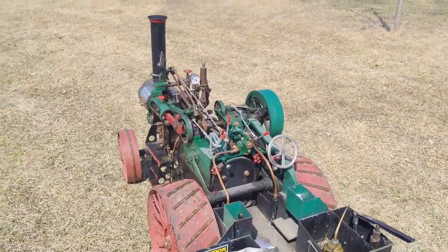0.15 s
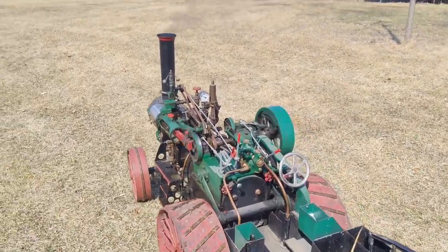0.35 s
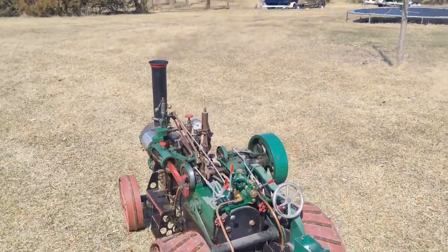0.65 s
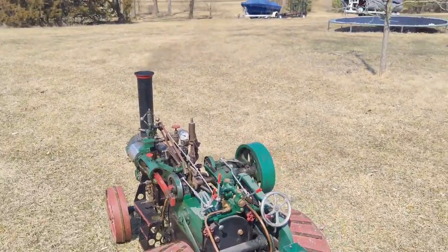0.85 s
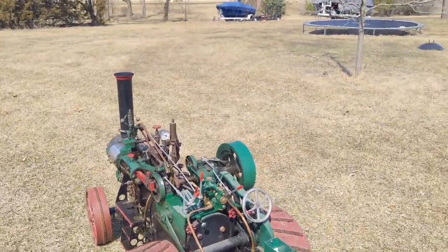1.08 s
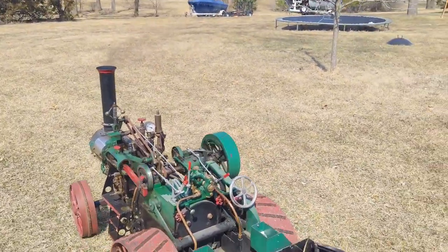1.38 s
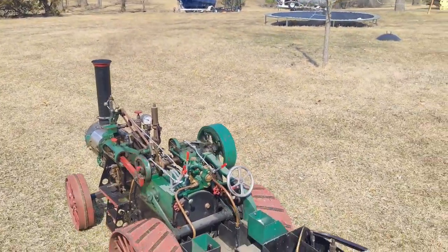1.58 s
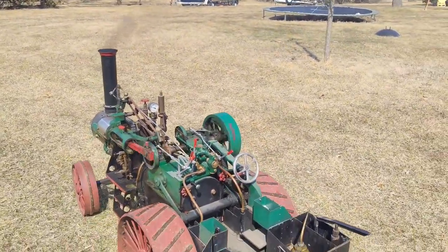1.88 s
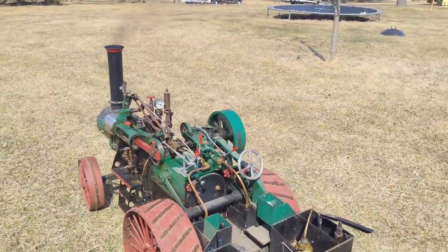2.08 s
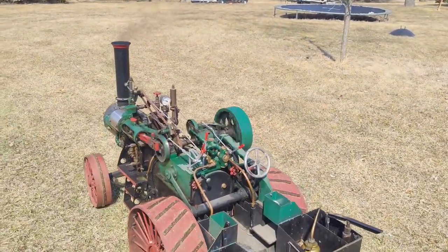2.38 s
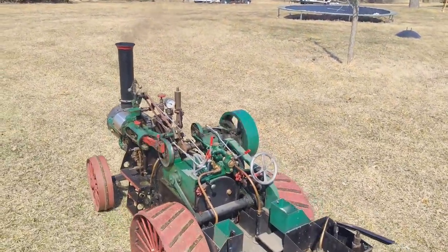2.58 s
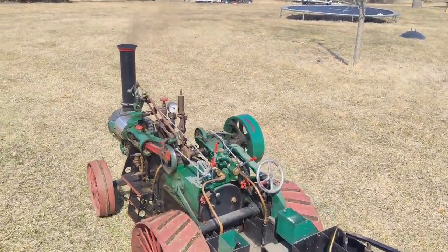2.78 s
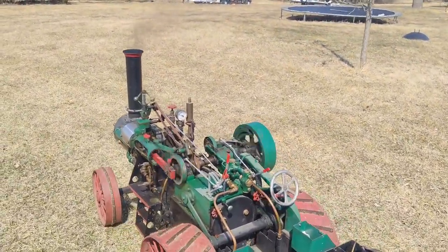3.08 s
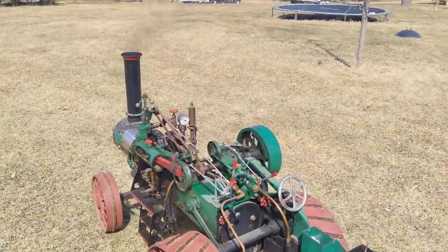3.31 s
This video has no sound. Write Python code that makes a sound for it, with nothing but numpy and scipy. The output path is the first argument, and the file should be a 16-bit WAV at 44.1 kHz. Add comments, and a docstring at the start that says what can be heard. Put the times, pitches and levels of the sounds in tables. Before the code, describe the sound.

Close behind a model steam engine outdoors: steady soft double chuffs, metallic clicks and steam leak. Low wind buffeting dominates early, a harsh gust roars on the right, and a short sharp steam spurt comes near the end.

```python
"""A model steam traction engine crawls over a lawn, heard from just behind it by a hand-held recorder.
From the start each crank turn gives two soft exhaust chuffs, a valve tick and mostly a knock, while steam leaks.
Wind rumbles, flutters and slaps at both microphone ports; steam spurts at 0.65 s.
From 1.2 to 2.3 s a gust of shaped noise rushes across the right port, with two hoots of wavering sine partials.
The engine and the wind go on after it, and a short, hissier spurt of steam comes at 3.18 s."""
import sys
import numpy as np
from scipy import signal
from scipy.fft import rfft, irfft
from scipy.io import wavfile
from scipy.ndimage import uniform_filter1d, map_coordinates

SR = 44100
rng = np.random.default_rng(int(sys.argv[2]) if len(sys.argv) > 2 else 0)


def generate_wav(signal):
    """Clip the signal to [-1, 1] and save it as 16-bit WAV at the path in sys.argv[1]."""
    frames = np.transpose(np.atleast_2d(signal))
    scaled = np.clip(frames, -1, 1) * 32767
    pcm = np.round(scaled).astype(np.int16)
    wavfile.write(sys.argv[1], SR, pcm)


N = 152145

# Start of each crank turn and its valve tick: start_s, level_db
CRANK_TURNS = [(0.045, -28), (.238, -36), (.431, -32), (0.622, -28), (0.808, -30), (0.993, -27.5),
               (1.174, -27), (1.357, -24), (1.540, -31), (1.723, -33), (1.910, -35), (2.097, -38),
               (2.282, -36), (2.466, -41), (2.649, -27), (2.829, -31), (3.011, -31), (3.195, -23),
               (3.376, -27)]
# Two hoots of the right port, each starting high, dropping a register and wavering lower:
# time_s, mean pitch_hz, level_db (before the hoot trim)
PORT_HOOTS = [
    [(1.31, 384.1, -42), (1.37, 395.8, -14), (1.43, 360.5, -50), (1.47, 409.2, -14), (1.53, 397.4, -19.5),
     (1.555, 270, -10.5), (1.61, 238, -16.5), (1.67, 263.8, -14.5), (1.76, 268.1, -18), (1.80, 225, -7.5),
     (1.845, 210, -16.5)],
    [(1.845, 385.3, -14.5), (1.872, 405.7, -11.5), (1.885, 240, -6), (1.92, 236.1, -16),
     (1.97, 282.2, -18.5), (2.04, 256.3, -13.5), (2.07, 241.2, -12.5), (2.13, 212, -19.5),
     (2.2, 224.1, -15.5), (2.32, 190.2, -21)],
]


def undb(db):
    """Turn decibels into amplitude gain."""
    return 10 ** (np.asarray(db) / 20)


def clock():
    """Give the time of every sample in seconds."""
    return np.arange(N) / SR


def curve(table, axis=1):
    """Join one column of a table by straight lines in time."""
    rows = np.array(table, float)
    return np.interp(clock(), rows[:, 0], rows[:, axis])


def noise(spectrum):
    """Colour unrelated noise for each dB column; the channels together have rms 1."""
    rows = np.array(spectrum, float)
    log_hz = np.log(np.maximum(np.fft.rfftfreq(N, 1 / SR), 1))
    gain = undb([np.interp(log_hz, np.log(rows[:, 0]), db) for db in rows.T[1:]])
    white = rng.standard_normal((len(gain), N))
    coloured = irfft(rfft(white) * gain, N)
    return coloured / np.sqrt(np.mean(coloured ** 2))


def walk(rate_hz):
    """Draw random levels at a steady rate and slew between them; spread 1."""
    hold = max(int(SR / rate_hz), 2)  # samples
    steps = rng.standard_normal(N)[np.arange(N) // hold]
    slewed = uniform_filter1d(steps, hold)
    return slewed / slewed.std()


def envelope(start, attack, hold, release):
    """Rise in a straight line, hold, then fall exponentially; all times in seconds."""
    age = clock() - start
    rise = np.clip(age / attack, 0, 1)
    return rise * np.exp(-np.maximum(age - attack - hold, 0) / release)


def fade_in_out(rows, fade_s):
    """Fade in from the first time of a table and die away from just before its last."""
    start, end = rows[0][0], rows[-1][0]
    return envelope(start, fade_s, end - start - fade_s, fade_s)


def exhaust():
    """Two puffs of steam up the chimney for each crank turn add their power to a draught."""
    # Colour of the exhaust in the chimney: freq_hz, left_db_per_hz, right_db_per_hz (relative)
    chimney_colour = [(150, 1, 10.5), (400, 1.5, 2.5), (740, -2, -1), (906, 13, 4.5), (1176, -9.5, -14),
                      (1380, 3, 0), (2210, -.5, -3), (2700, -5, -12), (4270, -4.5, -22), (6050, -33, -45),
                      (16000, -62, -65)]
    # Loudness of the exhaust, which swells while the engine is nearer: time_s, exhaust gain_db
    exhaust_swell = [(0, -2), (.6, -1), (1.3, 3), (2.2, 4), (2.6, 1), (3.45, 2.5)]
    fore_lag_s, return_lag_s = 0.012, 0.1044  # after the valve tick
    fore_db, return_db, draught_db = -38.5, -37, -45.5  # before the exhaust gain
    attack_s, hold_s, release_s = 0.016, 0.013, 0.053
    scatter_db = 0.5

    power = np.full(N, undb(draught_db) ** 2)
    luck = rng.standard_normal((len(CRANK_TURNS), 2))
    for (start, _), chances in zip(CRANK_TURNS, luck):
        for lag, db, chance in zip((fore_lag_s, return_lag_s), (fore_db, return_db), chances):
            puff = envelope(start + lag, attack_s, hold_s, release_s)
            power += (puff * undb(db + scatter_db * chance)) ** 2
    return noise(chimney_colour) * np.sqrt(power) * undb(curve(exhaust_swell))


def steam():
    """Wet steam sputters from the glands as flickering noise and now and then spurts."""
    # Level of the hiss on each channel: time_s, left_db, right_db; the right side dips while the gust blows
    leak_level = [(0, -37.5, -37), (.8, -34.5, -37.5), (.95, -37, -39), (1.2, -38.5, -36.5),
                  (1.9, -36.5, -42.5), (2.25, -36, -42), (2.35, -37.5, -38.5), (3.45, -39.5, -36.5)]
    # Spurts: start_s, hold_s (after the attack), level_db, release_s, top_hiss_level_db
    spurts = [(0.652, 0.21, -36, 0.015, -47.5), (3.177, 0.022, -36.5, 0.038, -31.5)]
    # Colours of leak, spurt and top hiss: freq_hz, left_db_per_hz, right_db_per_hz (relative)
    leak_colour = [(500, -3, -9), (1710, -4.5, -8.5), (3030, -10.5, -9.5), (3140, -1, -4.5), (3800, -2, -7),
                   (5060, -0.5, -4.5), (5870, -7, -4.5), (6700, -5.5, 3), (8140, -14, -7.5),
                   (10130, -27, -13.5), (11760, -63, -16.5), (15800, -50, -27.5)]
    spurt_colour = [(600, -23, -44), (2020, 2.5, -5), (2800, -6, -40), (4200, 4, -24), (7100, -9, -5),
                    (11000, -24, -35), (16000, -73, -34)]
    top_hiss_colour = [(2500, -29, -28), (4900, 4.5, -5), (7000, -2.5, 2.5), (10000, -15, -10),
                       (16000, -46, -14)]
    attack_s, sputter_db, sputter_hz = 0.014, 1.42, 110

    leak_db = np.array([curve(leak_level, axis=1), curve(leak_level, axis=2)])
    hiss = noise(leak_colour) * undb(leak_db)
    body, top = noise(spurt_colour), noise(top_hiss_colour)
    for start, hold, body_db, release, top_db in spurts:
        jet = undb(body_db) * body + undb(top_db) * top
        hiss += envelope(start, attack_s, hold, release) * jet
    return hiss * undb(sputter_db * walk(sputter_hz))


def strikes(rows, decay_s):
    """Add the power of sudden, quickly damped bursts and return their level."""
    attack_s = 0.0004
    power = sum((undb(db) * envelope(start, attack_s, 0, decay_s)) ** 2 for start, db in rows)
    return np.sqrt(power)


def motion_work():
    """Valve ticks, rod knocks and loose gear teeth sound as damped bursts of coloured noise."""
    # Knocks of the rod and gears: start_s, level_db (before the knock trim)
    knock_times = [(.018, -23), (.162, -25), (.351, -23.5), (.545, -30), (.735, -33), (1.285, -37),
                   (1.466, -28), (1.649, -26), (1.836, -36), (2.392, -24.5), (2.757, -19.5), (2.936, -33),
                   (3.119, -18.5), (3.304, -35)]
    # Ring of the valve and of the frame: freq_hz, left_db_per_hz, right_db_per_hz (relative)
    valve_colour = [(4400, -28, -36), (5950, -14, 14), (7020, 0, 18.5), (8400, -24, -11), (16000, -70, -75)]
    frame_colour = [(400, -36, -38), (940, 11, -20), (1310, 4, 5), (2700, 6, 6), (4530, 13.5, -0.5),
                    (6900, -7, 9), (8900, -20, -6), (16000, -53, -20)]
    tick_decay_s, knock_decay_s, knock_trim_db = 0.003, 0.0059, -5.5
    rattle_per_s, rattle_db, rattle_scatter_db, rattle_decay_s = 55, -45, 3.5, 0.006

    ticks = noise(valve_colour) * strikes(CRANK_TURNS, tick_decay_s)
    knocks = strikes(knock_times, knock_decay_s) * undb(knock_trim_db)
    hits = rng.random(N) < rattle_per_s / SR  # at random times
    teeth = hits * undb(rattle_db + rattle_scatter_db * rng.standard_normal(N))
    rattle = signal.lfilter([1], [1, -np.exp(-1 / (rattle_decay_s * SR))], teeth)
    return ticks + noise(frame_colour) * np.hypot(knocks, rattle)


def buffet(strength):
    """Large eddies rumble on one port while small ones flutter, their levels swaying together."""
    # Colours of the large and the small eddies: freq_hz, level_db_per_hz (relative)
    rumble_colour = [(8, -25), (20, -0.5), (45, 0), (80, -2.5), (125, -5), (180, -10.5), (300, -20),
                     (600, -81)]
    flutter_colour = [(60, -27), (120, -2.5), (170, 2), (250, -3), (400, -9), (600, -22), (1000, -29),
                      (2000, -64), (5000, -106)]
    eddy_hz, rumble_eddy_db, flutter_eddy_db = 40.27, 1.64, 2.5
    rumble_trim_db, flutter_trim_db = 0.5, -1

    eddies = walk(eddy_hz)
    rumble_db = curve(strength, axis=1) + rumble_trim_db + rumble_eddy_db * eddies
    flutter_db = curve(strength, axis=2) + flutter_trim_db + flutter_eddy_db * eddies
    rumble = noise(rumble_colour)[0] * undb(rumble_db)
    flutter = noise(flutter_colour)[0] * undb(flutter_db)
    return rumble + flutter


def slaps(rows):
    """Single eddies thump a port; tearing air grows faster than the thump, so hard ones are brighter."""
    # Colours of the thump and of the tearing air: freq_hz, level_db_per_hz (relative)
    thump_colour = [(50, 6.5), (110, 7.5), (200, 3.5), (330, -5), (500, -14), (800, -28), (1300, -38.5),
                    (2500, -37), (6000, -70)]
    tear_colour = [(200, -4.5), (450, -3.5), (750, -9), (1400, -20.5), (5000, -64)]
    attack_s, hold_s, decay_s = 0.0013, 0.0041, 0.016
    trim_db, tear_db, tear_growth = 3.5, -9, 1.5

    level = sum(undb(db + trim_db) * envelope(start, attack_s, hold_s, decay_s) for start, db in rows)
    thump = noise(thump_colour)[0] * level
    tear = noise(tear_colour)[0] * undb(tear_db) * level ** tear_growth
    return thump + tear


def whistle(rows, width_hz):
    """A narrow band of noise, slow noise shifted up in pitch, follows a centre and level curve."""
    lowpass = signal.butter(2, width_hz / 2, fs=SR, output="sos")
    wobble = signal.sosfilt(lowpass, rng.standard_normal((2, N)))
    phase = 2 * np.pi * np.cumsum(curve(rows)) / SR
    band = (wobble[0] * np.cos(phase) + wobble[1] * np.sin(phase)) / wobble.std()
    return band * fade_in_out(rows, fade_s=0.03) * undb(curve(rows, axis=2))


def gust():
    """Air tears across the right port, brighter when harder, rasping at the hoot's low-register period."""
    # Level of the rush: time_s, level_db (before the rush trim)
    rush_level = [(1.2, -24), (1.39, -45), (1.425, -19), (1.45, -40), (1.475, -17.5), (1.495, -20),
                  (1.51, -18), (1.545, -16), (1.575, -15.5), (1.63, -19), (1.675, -19), (1.70, -14),
                  (1.76, -19), (1.84, -26.5), (1.93, -20), (1.97, -13.5), (1.99, -31.5), (2.005, -20.5),
                  (2.1, -22.5), (2.24, -27), (2.34, -47)]
    # Colours of the rush and of its harsh edge: freq_hz, level_db_per_hz (relative)
    rush_colour = [(200, -3.5), (420, 4), (620, -4.5), (950, 2.5), (1250, -3.5), (1800, -9.5),
                   (2400, -15.5), (3500, -24), (8000, -76)]
    edge_colour = [(700, 4.5), (1600, 3), (2600, -2), (3600, -9.5), (5000, -11), (7000, -16), (10000, -65)]
    # Harsh surges within the gust: start_s, hold_s (after the attack), level_db
    harsh_surges = [(1.503, .006, -14.5), (1.692, .016, -18.5), (1.962, .008, -18.5), (2.0, .004, -19.5)]
    rush_trim_db, full_db, edge_offset_db, edge_growth = -1, -5, -6, 1.38
    register_break_hz, register_ratio = 330, 1.6
    echo_gain, rasp_depth = 0.45, 0.7
    eddy_hz, eddy_db = 220, 2.7
    surge_attack_s, surge_decay_s = 0.0015, 0.006

    rush_db = curve(rush_level)
    edge_db = full_db + edge_offset_db + edge_growth * (rush_db - full_db)
    eddies = fade_in_out(rush_level, fade_s=0.054) * undb(eddy_db * walk(eddy_hz))

    # Bring the high pitches of the hoots down to the low register.
    low_register = []
    for rows in PORT_HOOTS:
        for time, hz, _ in rows:
            low_register.append((time, hz / register_ratio if hz > register_break_hz else hz))
    period = SR / curve(sorted(low_register))  # samples

    # The rush repeats itself, more weakly, one and two periods later.
    air = noise(rush_colour)[0]
    rasp = sum(echo_gain ** k * map_coordinates(air, [np.arange(N) - k * period], order=1, mode="wrap")
               for k in range(3))
    rush = rasp / rasp.std() * undb(rush_db + rush_trim_db) * eddies

    # The edge pulses in strength once a period.
    pulsing = 1 + rasp_depth * np.cos(2 * np.pi * np.cumsum(1 / period))
    edge = noise(edge_colour)[0] * pulsing / np.sqrt(np.mean(pulsing ** 2))
    surges = sum(undb(db) * envelope(start, surge_attack_s, hold, surge_decay_s)
                 for start, hold, db in harsh_surges)
    return rush + edge * np.hypot(undb(edge_db) * eddies, surges)


def hoot(rows):
    """Vortices shed at the port's edge make a low tone of sine partials, jittered in pitch and level."""
    # Overtones of the hoot: multiple of the pitch, level_db (relative)
    partials = [(1, 2), (2, -17), (3, -15), (4, -16.5), (5, -32)]
    jitter, jitter_hz = 0.034, 160  # share of the pitch, rate
    flicker_db, flicker_hz = 2.2, 90
    trim_db = -3.5

    pitch_hz = curve(rows) * (1 + jitter * walk(jitter_hz))
    phase = 2 * np.pi * np.cumsum(pitch_hz) / SR
    tone = sum(undb(db + flicker_db * walk(flicker_hz)) * np.sin(round(multiple) * phase)
               for multiple, db in partials)
    level = fade_in_out(rows, fade_s=0.015) * undb(curve(rows, axis=2) + trim_db)
    return np.sqrt(2) * tone * level  # root 2 gives a sine rms 1


def scene():
    """The engine sounds in open air on both channels, with separate wind on each port."""
    # Wind at each port: time_s, rumble_db, flutter_db (before the trims)
    wind_left = [(0, -19, -35), (0.18, -24, -35), (0.3, -14, -22.5), (0.42, -15, -32), (0.66, -15, -22.5),
                 (0.9, -12.5, -35), (0.97, -31, -42), (1.3, -22.5, -37), (1.55, -27.5, -35),
                 (1.74, -12.5, -32), (1.85, -23, -37), (1.98, -17, -27), (2.12, -27, -33.5),
                 (2.7, -22.5, -43), (3.45, -34, -39)]
    wind_right = [(0, -20.5, -29), (.3, -12.5, -29), (.45, -13.5, -21.5), (.56, -11, -19),
                  (.72, -13.5, -17.5), (.88, -10, -18), (.98, -19, -28), (1.1, -14, -14.5),
                  (1.45, -15.5, -20.5), (1.6, -19, -19), (1.98, -15, -29), (2.15, -17, -16.5),
                  (2.5, -17.5, -28.5), (2.62, -16, -28), (3.1, -19.5, -30), (3.45, -20, -30.5)]
    # Single eddies that slap each port: start_s, level_db (before the trim)
    slaps_left = [(.285, -17.5), (.635, -17), (.9, -14), (1.713, -23), (2.75, -25)]
    slaps_right = [(0.244, -13.5), (0.533, -13), (.575, -15.5), (0.635, -11), (0.673, -10), (0.729, -14),
                   (0.752, -12), (0.8, -15), (1.415, -8), (1.858, -14.5), (1.94, -10), (2.003, -7.5),
                   (2.63, -17.5), (2.932, -18), (3.068, -18.5), (3.097, -21)]
    # Breathy whistle of the leak, on the left: time_s, centre_hz, level_db
    leak_whistle = [(.6, 4510, -44), (1.0, 4410, -43), (1.13, 4306, -36), (1.95, 4370, -49.5),
                    (2.8, 4475, -39.5), (3.45, 4610, -40.5)]
    # Breathy whistles of the right port, a low one rising ahead of the hoots and a high one falling
    # in the gust: time_s, centre_hz, level_db
    port_whistles = [
        [(1.03, 260.7, -27), (1.22, 360, -25.5), (1.40, 396.4, -21)],
        [(1.48, 1057, -22), (1.60, 854, -39)],
    ]

    left = buffet(wind_left) + slaps(slaps_left) + whistle(leak_whistle, width_hz=520)
    hoots = sum(hoot(rows) for rows in PORT_HOOTS)
    whistles = sum(whistle(rows, width_hz=130) for rows in port_whistles)
    right = buffet(wind_right) + slaps(slaps_right) + gust() + hoots + whistles
    return exhaust() + steam() + motion_work() + np.array([left, right])


def record(dry):
    """The hand-held recorder rounds the highest peaks and cuts the top of the treble."""
    top_hz = 15700
    rounded = dry / (1 + dry ** 6) ** (1 / 6)
    return signal.sosfilt(signal.ellip(10, 0.1, 80, top_hz, fs=SR, output="sos"), rounded)


dry = scene()
out = record(dry)
generate_wav(out)
```